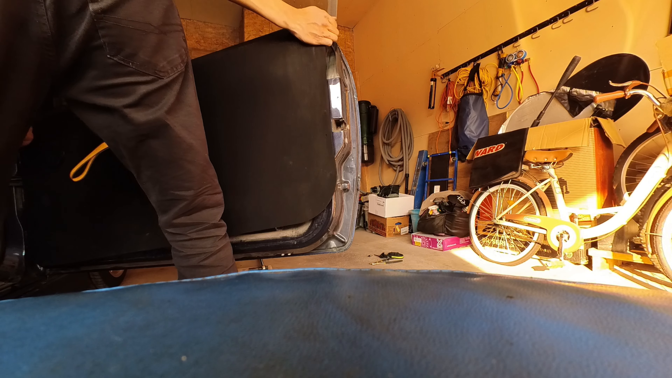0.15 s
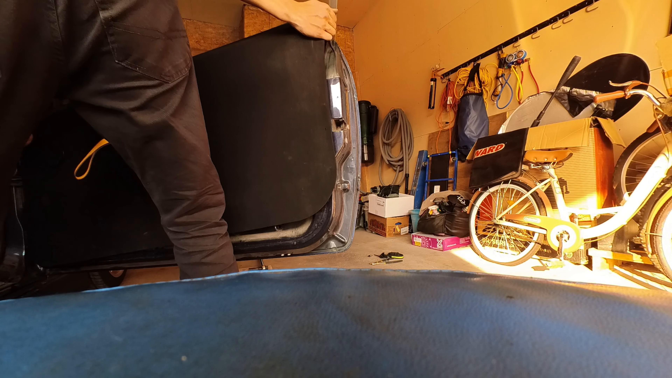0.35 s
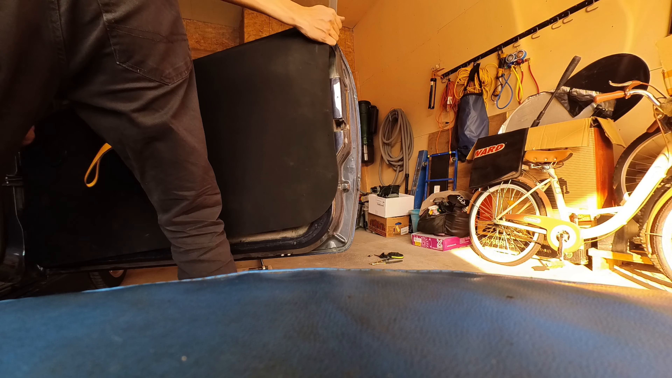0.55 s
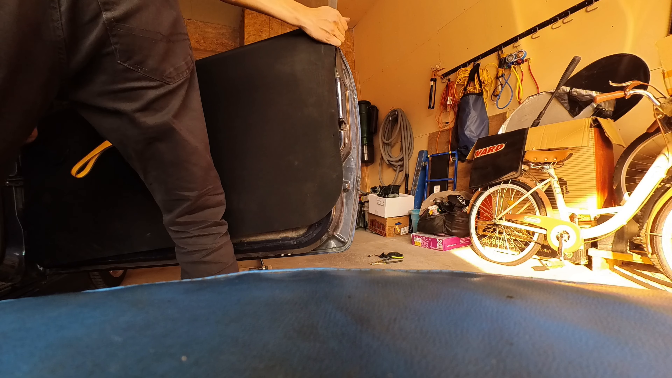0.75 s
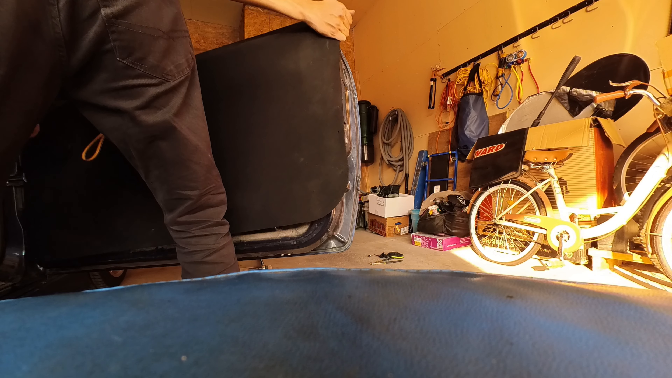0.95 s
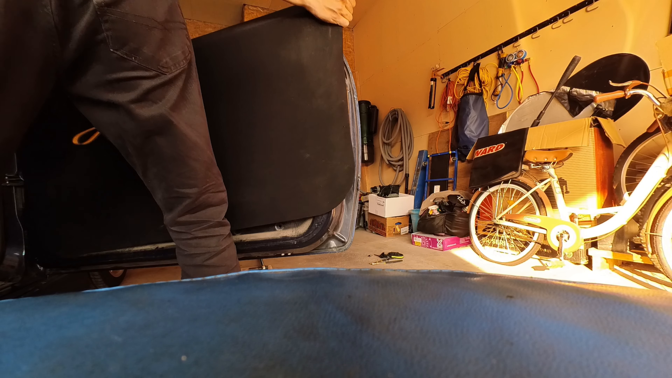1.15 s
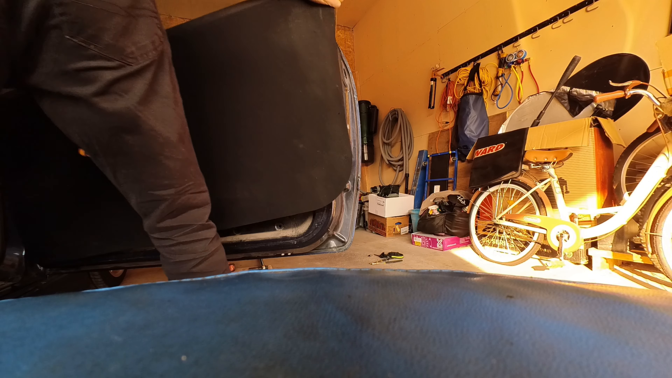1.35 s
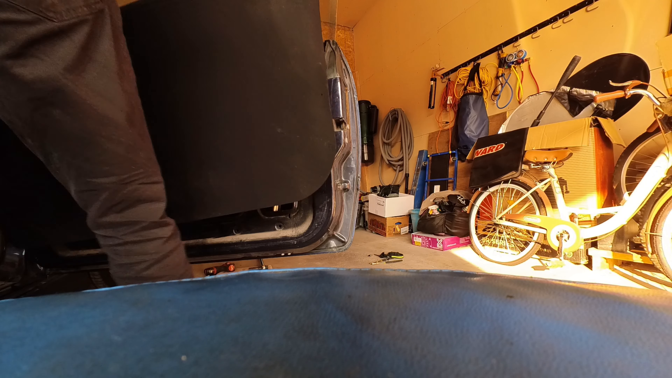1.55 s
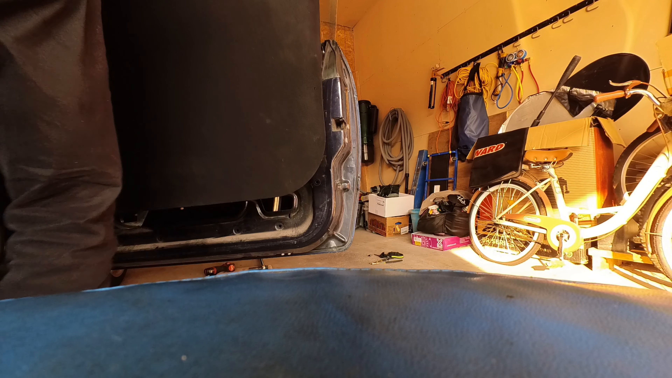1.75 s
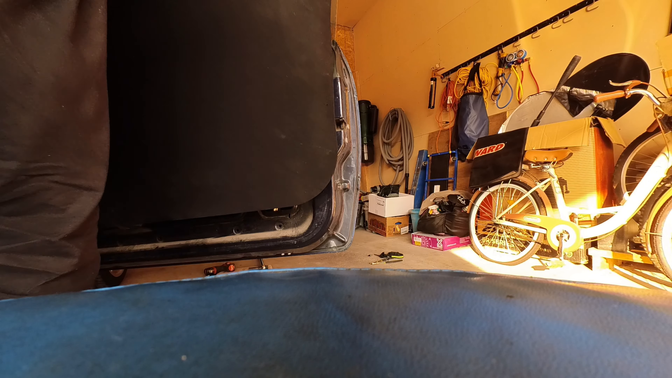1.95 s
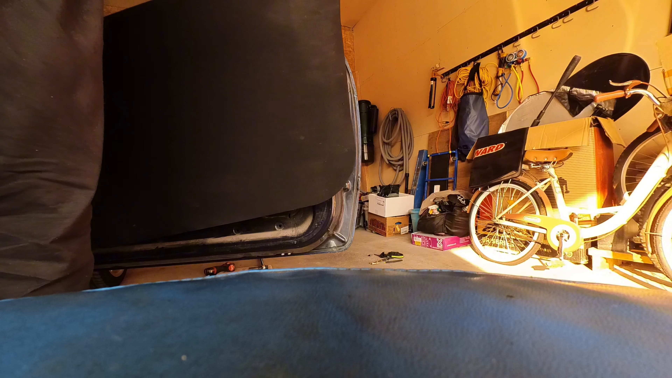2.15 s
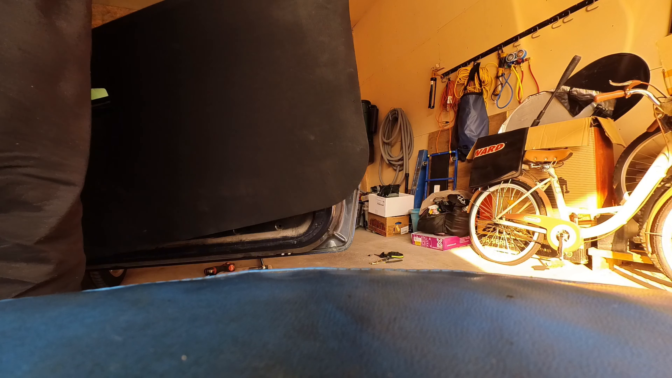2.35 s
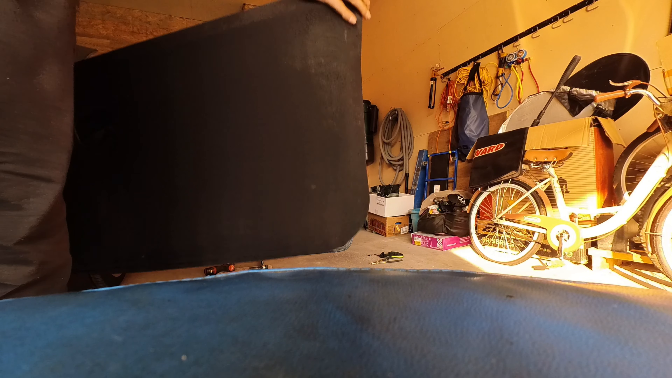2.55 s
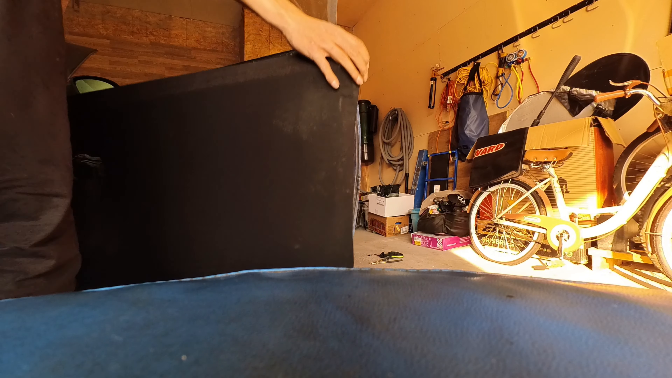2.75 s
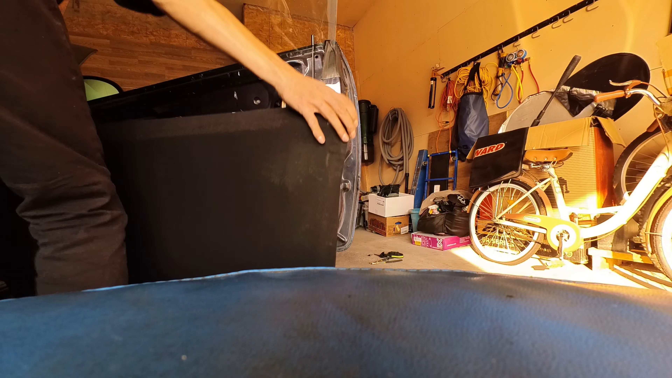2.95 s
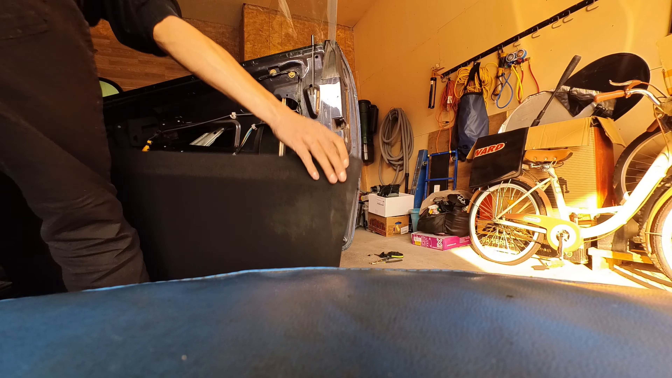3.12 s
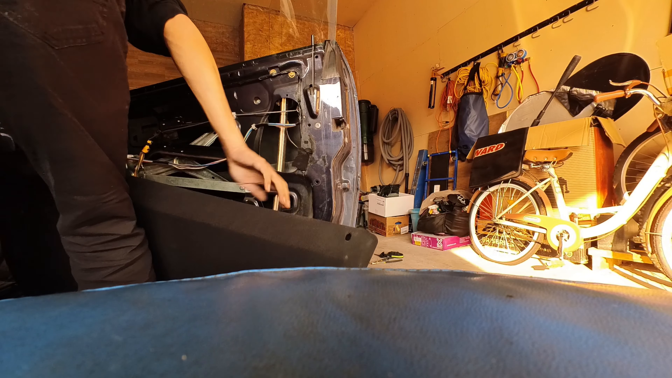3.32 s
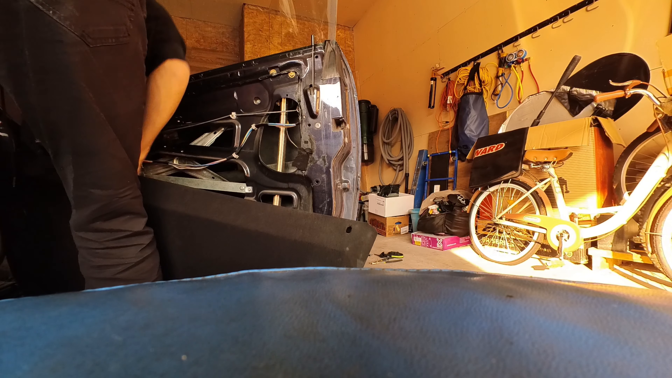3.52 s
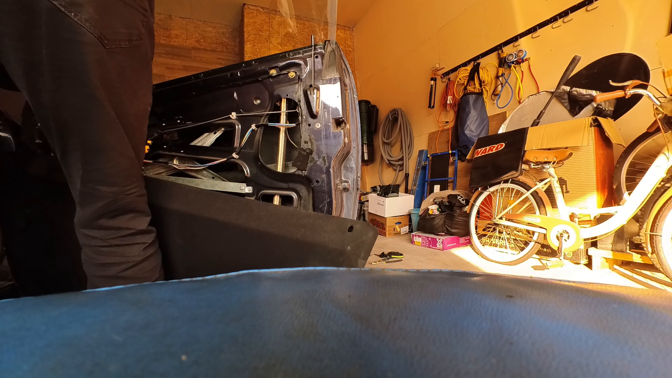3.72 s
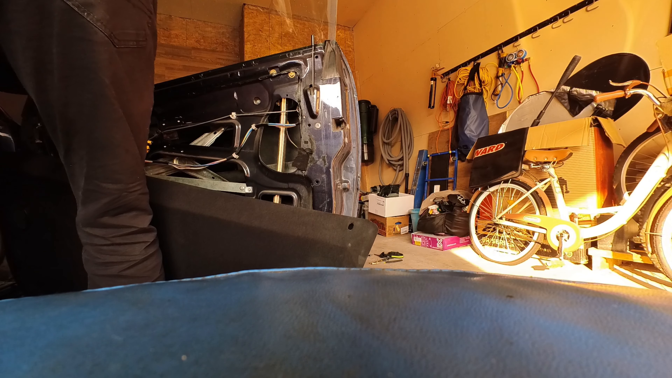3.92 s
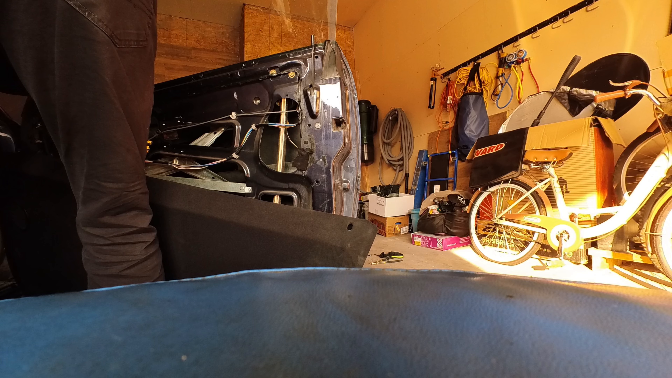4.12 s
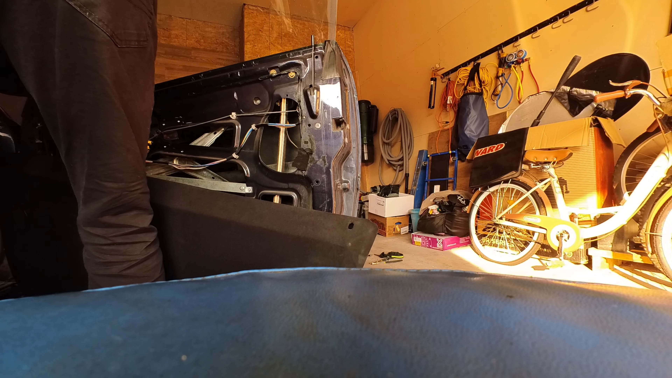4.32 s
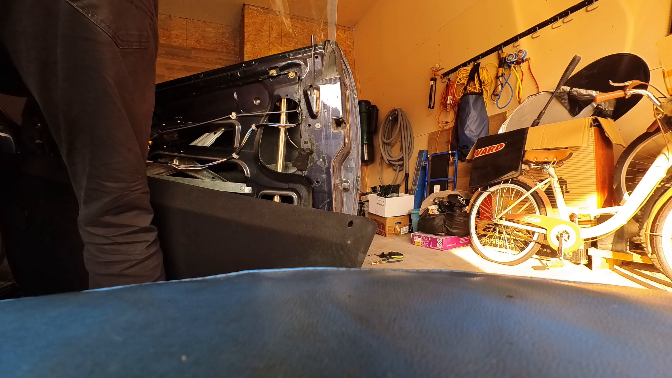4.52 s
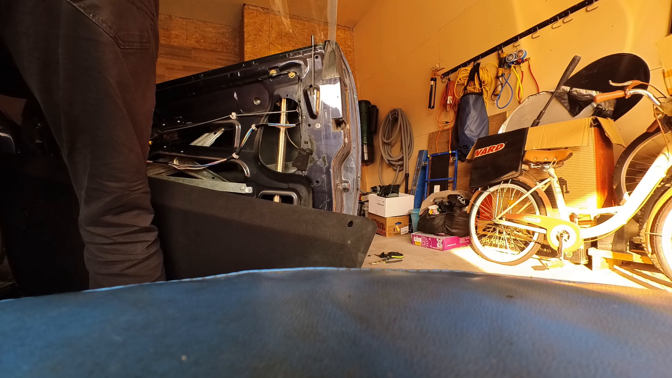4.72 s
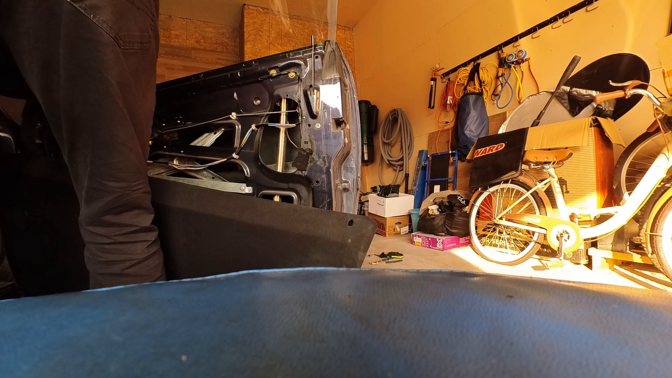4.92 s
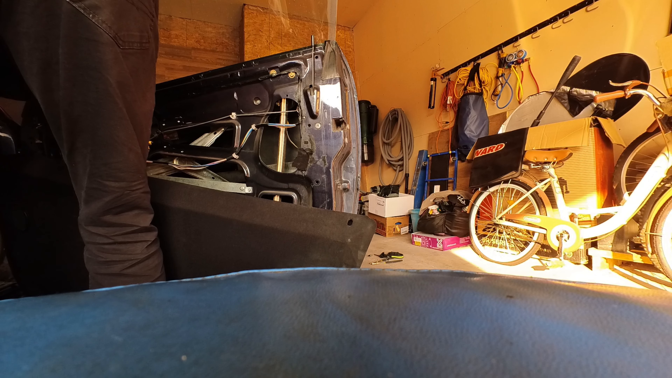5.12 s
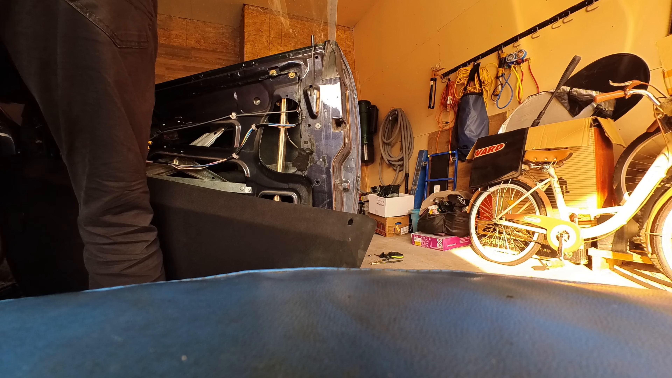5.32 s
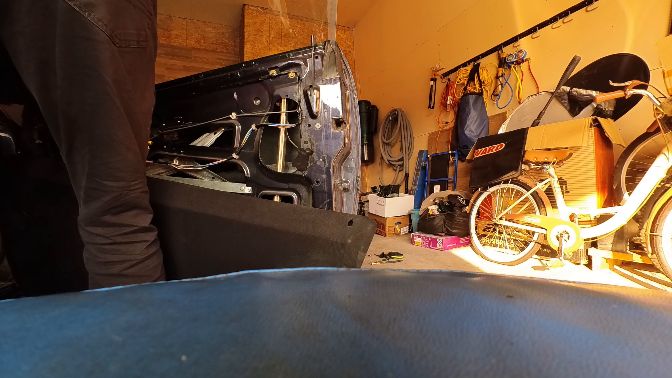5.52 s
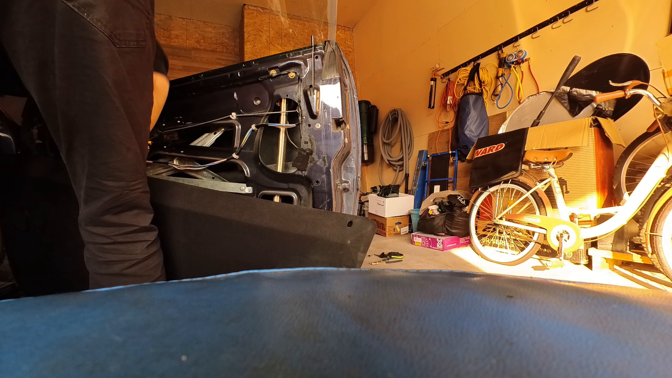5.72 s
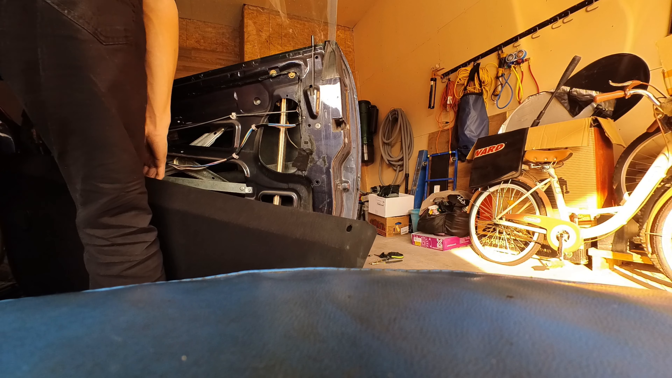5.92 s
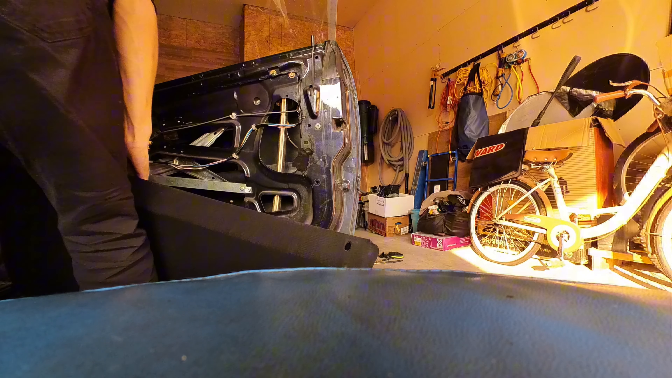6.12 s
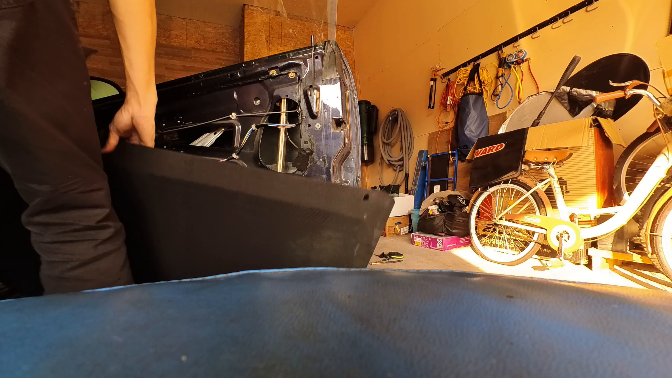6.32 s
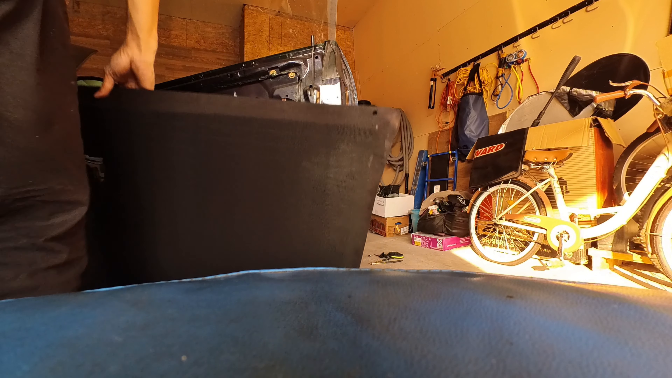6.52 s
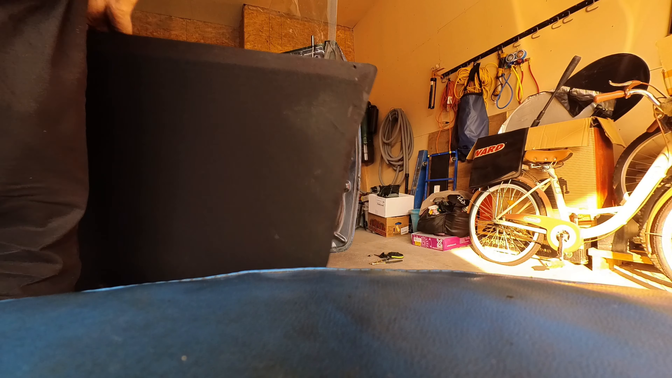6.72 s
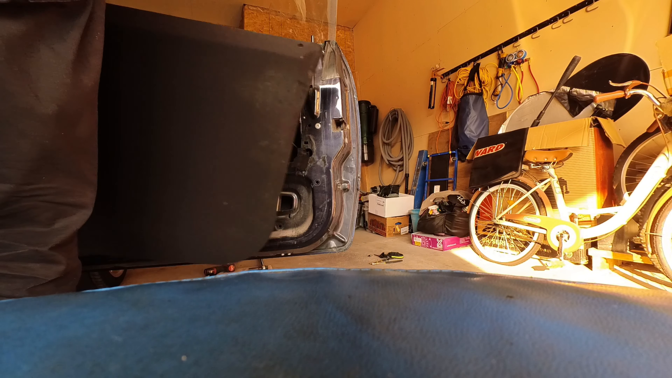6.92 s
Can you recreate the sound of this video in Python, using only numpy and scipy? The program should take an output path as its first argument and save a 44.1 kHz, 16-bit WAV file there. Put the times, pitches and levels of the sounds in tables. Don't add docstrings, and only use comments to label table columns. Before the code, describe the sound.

A small camera microphone sits near a car door in a cluttered, short-echoing garage. A low wobbling panel rumble fades, a hard hollow knock rings out, clips snap and edges scrape. The panel drops on the floor edge by edge, loud and woody, rocking quickly to rest. Road wash fills the gap before a clip click, a late knock, scuffing and a dull bump.

```python
import sys
import numpy as np
from scipy import signal
from scipy.fft import rfft, irfft, next_fast_len
from scipy.io import wavfile
from scipy.ndimage import uniform_filter1d, minimum_filter1d, map_coordinates

SR = 44100
rng = np.random.default_rng(int(sys.argv[2]) if len(sys.argv) > 2 else 0)


def bounce(signal):
    frames = np.transpose(np.atleast_2d(signal))
    limited = np.clip(frames, -1, 1)
    pcm = np.round(limited * 32767).astype(np.int16)
    wavfile.write(sys.argv[1], SR, pcm)


def makeup_ratio(level_db):
    decades = np.asarray(level_db, float) / 20
    return 10 ** decades


N = 306936


def unit(x):
    return x / np.sqrt(np.mean(x ** 2) + 1e-20)


def along(points, hz):
    point_hz, value = np.transpose(points)
    return np.interp(np.log(hz + 1), np.log(point_hz + 1), value)


def curve(rows):
    time_s, level_db = np.transpose(rows)
    return makeup_ratio(np.interp(np.arange(N) / SR, time_s, level_db, -200, -200))


def wobble(rate_hz):
    knots = rng.standard_normal(int(N * rate_hz / SR) + 4)
    return map_coordinates(knots, [np.arange(N) * rate_hz / SR])


def filtered(x, response):
    m = next_fast_len(x.shape[-1] + 2048)
    spectrum = rfft(x, m) * response(np.fft.rfftfreq(m, 1 / SR))
    return irfft(spectrum, m)[..., :x.shape[-1]]


def resonance(hz, width_hz):
    return lambda f: 1j * f * width_hz / (hz * hz - f * f + 1j * f * width_hz)


def rush(spectrum, patchy_db, spiky_db=0, size=8, count=10):
    white = rng.standard_normal(N) * makeup_ratio(spiky_db * wobble(900))
    z = signal.stft(white, nperseg=512)[2]
    field = uniform_filter1d(rng.standard_normal(z.shape), size, 0)
    field = uniform_filter1d(field, count, 1)
    patched = signal.istft(z * makeup_ratio(patchy_db * unit(field)), nperseg=512)[1][:N]
    return unit(filtered(patched, lambda hz: makeup_ratio(along(spectrum, hz))))


def stroke(peak_s, level_db, swell_s, fade_s):
    gain = np.zeros(N)
    first = max(0, int((peak_s - 5 * swell_s) * SR))
    last = min(N, int((peak_s + 5 * fade_s) * SR))
    late_s = np.arange(first, last) / SR - peak_s
    gain[first:last] = makeup_ratio(level_db - 20 * np.maximum(-late_s / swell_s, late_s / fade_s))
    return gain


def add(track, start_s, sound):
    part = track[round(start_s * SR):][:len(sound)]
    part += sound[:len(part)]


# time_s, level_db
ROAD_SWELL = [(0.0, -44.5), (.45, -43.5), (.8, -41), (2.29, -42), (2.89, -40.5), (3.37, -38), (3.9, -40),
              (5.19, -40), (5.78, -41.5), (6.96, -43)]
# hz, density_db
ENGINE_SPECTRUM = [(12, -52), (20, -0.5), (42, -9), (60, -1), (123, 3.5), (292, -1), (400, -18.5),
                   (520, -47), (880, -120)]
# hz, density_db
TYRE_SPECTRUM = [(88, -39), (150, -16.5), (245, -1.5), (360, -7), (399, -4), (477, -2), (553, -5), (903, 0),
                 (1160, -0.5), (1270, -3.5), (1560, -4.5), (2100, -12.5), (3190, -27), (4040, -44.5),
                 (5200, -54), (6760, -81.5), (11400, -120)]


def road():
    swell = curve(ROAD_SWELL)
    engines = unit(makeup_ratio(.6 * wobble(3.9)) * rush(ENGINE_SPECTRUM, patchy_db=1.4))
    tyres = makeup_ratio(-1.0 + 0.2 * wobble(3.4)) * rush(TYRE_SPECTRUM, patchy_db=0.8)
    return swell * (makeup_ratio(-7) * engines + tyres)


# hz, density_db
SWAY_SPECTRUM = [(12, -34), (25, -8), (45, -0.5), (70, -10), (150, -92)]


def handling():
    let_go_s, level_db = 2.7, -51.5
    sway = makeup_ratio(3 * wobble(4.96)) * rush(SWAY_SPECTRUM, patchy_db=-1.0)
    return stroke(let_go_s, level_db, 13.0, .5) * sway


# start_s, peak_db
BUMPS = [(0.755, -36.5), (0.941, -39), (0.971, -36.5), (1.006, -38), (1.031, -39), (1.057, -24.5),
         (1.097, -32), (1.502, -32.5), (1.932, -45), (1.948, -36), (2.779, -54), (3.533, -36), (6.3, -47),
         (6.35, -48), (5.3, -43)]


def bumps():
    track = np.zeros(N)
    cycle = np.arange(SR // 10) / SR * 80
    thud = np.sin(2 * np.pi * cycle) * np.exp(-((cycle - .55) / .5) ** 2)
    for start_s, peak_db in BUMPS:
        add(track, start_s, makeup_ratio(peak_db + 4.5) * thud)
    return track


# peak_s, level_db, swell_s, fade_s
SLEEVE = [
    (3.838, -66, .015, .02),
    (3.87, -58, .03, 0.066),
    (4.06, -69, .012, 0.053),
]
# hz, density_db
CLOTH_SPECTRUM = [(2350, -49), (4000, -17), (5250, -2), (8170, -10), (9410, -21), (11500, -14),
                  (14200, -17), (15500, -30)]


def sleeve():
    rustle = rush(CLOTH_SPECTRUM, patchy_db=3.5, spiky_db=2, size=4, count=6)
    return sum(stroke(*row) for row in SLEEVE) * rustle


# peak_s, level_db, hiss_db, swell_s, fade_s
PANEL_STROKES = [(.1, -57, -11.5, 0.11, 0.31), (.31, -61, -16.5, 0.034, 0.074), (.4, -58, -5, 0.022, 0.011),
                 (.43, -77, -2, .02, 0.14), (.69, -60.5, -15, .05, 0.14), (.98, -63, -24, 0.094, .13),
                 (1.09, -56.5, -15, 0.088, 0.043), (1.16, -65, -29, 0.04, .07), (1.3, -78.5, -6, .3, .45),
                 (1.61, -55.5, -12, 0.097, 0.13), (1.78, -75, -15, .2, .1), (1.879, -49.5, -9.5, .04, 0.1),
                 (2.12, -69, -10.5, 0.37, 0.14), (2.48, -66.5, -6, 0.021, 0.68),
                 (2.678, -56.5, -5.5, 0.18, 0.034), (2.776, -68, -7.5, 0.073, 0.27),
                 (2.992, -53.5, -14.5, 0.064, 0.056), (3.16, -55, -21, 0.086, 0.12),
                 (3.188, -44, -11.5, 0.046, .02), (3.314, -48, -9.5, 0.21, 0.02)]
# peak_s, level_db, hiss_db, swell_s, fade_s
SHOE_STROKES = [(5.28, -41.5, -11, .003, 0.018), (5.295, -68, -10, .01, .07), (5.525, -73, -20, .07, .05),
                (5.645, -73.5, -26, .04, .06), (5.75, -77, -26, .06, .12), (6.038, -70, -8, 0.1, 0.05),
                (6.168, -61, -13, .015, 0.12), (6.198, -57, -22, .015, 0.024),
                (6.296, -62, -18, 0.11, 0.18), (6.362, -58, -12, 0.042, 0.081), (6.45, -75, -4, .05, 0.65),
                (6.606, -58.5, -7, 0.017, 0.057), (6.66, -63, -12, 0.014, 0.31),
                (6.95, -79, -16, 0.019, .03)]
# hz, density_db
SCRAPE_SPECTRUM = [(1470, -27), (2500, 4), (2920, 4), (3140, 2.5), (3420, -3), (4120, -3), (4750, -7),
                   (5100, -3), (5500, -9), (6650, -9.5), (8110, -12.5), (10500, -35), (13600, -52),
                   (22000, -120)]
# hz, density_db
HISS_SPECTRUM = [(5590, -35), (9500, -6.5), (10800, -5), (13400, 3), (15000, -4.5), (15600, -7.5)]


def scuff():
    scrape_gain, hiss_gain = np.zeros(N), np.zeros(N)
    for peak_s, level_db, hiss_db, swell_s, fade_s in PANEL_STROKES + SHOE_STROKES:
        gain = stroke(peak_s, level_db, swell_s, fade_s)
        scrape_gain += gain
        hiss_gain += gain * makeup_ratio(hiss_db)
    clumps = makeup_ratio(1.2 * wobble(30))
    scrape = scrape_gain * rush(SCRAPE_SPECTRUM, 3.2, 1.8, size=3, count=9)
    hiss = hiss_gain * rush(HISS_SPECTRUM, 3, 1.5, size=3, count=8)
    return clumps * (scrape + hiss)


# start_s, peak_db, centre_hz
TICKS = [(0.166, -56.5, 13100), (0.1764, -51, 13400), (0.184, -49, 14100), (0.2044, -55, 14800),
         (0.2134, -50, 14700), (0.233, -48, 13800), (0.2572, -46.5, 13600), (0.2856, -40, 13700),
         (0.3113, -40, 13300), (0.3501, -46, 12400), (0.3935, -49, 12500), (.676, -57.5, 13000),
         (1.5584, -59.5, 13100), (2.1405, -56, 12900), (2.1624, -64, 13100), (2.811, -55, 14000),
         (2.845, -58, 13500), (2.93, -60, 9500), (3.167, -48, 13000), (3.177, -46, 13000)]


def ticks():
    track, t = np.zeros(N), np.arange(SR // 40) / SR
    for start_s, peak_db, hz in TICKS:
        slip = rng.standard_normal(len(t)) * makeup_ratio(-60 * t / .012)
        burst = filtered(slip, lambda f: resonance(hz, 2500)(f) ** 2)
        add(track, start_s, makeup_ratio(peak_db - 0.5) * burst / np.abs(burst).max())
    return track


# start_s, peak_db, centre_hz, hiss_db
SNAPS = [(0.6694, -55, 3580, -17), (1.076, -47, 3640, -11), (1.1514, -57, 4060, -34),
         (1.558, -56.5, 5000, -15), (1.593, -45, 5040, -22), (1.857, -40, 6500, -9),
         (2.549, -49.5, 5660, -15), (2.7795, -43, 3250, -17), (2.944, -47, 3580, -15),
         (2.984, -39.5, 3570, -14), (3.1687, -26.5, 3860, -20), (3.1846, -30, 4900, -19.5),
         (3.338, -36, 5000, -21), (3.344, -32.5, 5800, -15), (3.35, -27.5, 5500, -17),
         (3.356, -17, 6000, -19), (3.3614, -29, 3680, -26), (3.367, -24.5, 5750, -25),
         (3.384, -39, 7500, -27), (3.404, -42, 7000, -25), (3.431, -39, 4940, -35), (3.836, -52, 6470, -7),
         (3.8527, -43, 6500, -4), (4.049, -46.5, 3660, -20), (5.2704, -36, 4890, -11),
         (5.2766, -33.5, 6500, -8), (6.1745, -34.5, 5660, -36), (6.198, -44, 3500, -27),
         (6.284, -47, 5500, -20), (6.345, -43, 3000, -15), (6.359, -37.5, 3600, -16),
         (6.601, -50.5, 5070, -11), (6.6603, -54, 5240, -15)]
# hz, density_db
CRACK_SPECTRUM = [(1470, -22), (2500, -3.5), (2750, -5), (3420, -8.5), (3880, -12), (4640, -8),
                  (5460, -10.5), (8930, -28.5), (10500, -28.5), (13600, -59), (22000, -120)]


def snaps():
    track, t = np.zeros(N), np.arange(SR // 5) / SR
    t60_s, rise_s = 0.048, .0012
    decay = makeup_ratio(-60 * t / t60_s)
    envelope = (1 - np.exp(-t / rise_s)) * decay
    scale = np.sqrt(t60_s * SR / 14)
    for start_s, peak_db, hz, hiss_db in SNAPS:
        noise = rng.standard_normal((3, len(t))) * envelope
        tone = filtered(noise[0] * decay, lambda f: resonance(hz, .35 * hz)(f) ** 2)
        crack = filtered(noise[1], lambda f: makeup_ratio(along(CRACK_SPECTRUM, f)))
        puff = filtered(noise[2], lambda f: makeup_ratio(along(HISS_SPECTRUM, f)))
        tone, crack, puff = [scale * p / np.linalg.norm(p) for p in (tone, crack, puff)]
        add(track, start_s, makeup_ratio(peak_db - 7) * (.6 * tone + .8 * crack + makeup_ratio(hiss_db) * puff))
    return track


# hz, level_db, t60_s
CLIP_MODES = [(5060, -54, 0.06), (6800, -53, 0.067), (11600, -52, 0.063)]


def clip():
    track, t = np.zeros(N), np.arange(SR // 4) / SR
    for hz, level_db, t60_s in CLIP_MODES:
        ring = filtered(rng.standard_normal(len(t)), lambda f: resonance(hz, 250)(f) ** 2)
        add(track, 5.2785, makeup_ratio(level_db - 60 * t / t60_s) * unit(ring))
    return track


# start_s, peak_db, hz, t60_s
PINGS = [(.677, -60, 7800, 0.017), (1.865, -48, 6740, .02), (1.877, -47, 6900, .02), (1.88, -50, 5000, .02),
         (2.781, -46, 5330, .015), (3.176, -39, 4500, .015), (3.187, -36, 4900, .015),
         (3.3568, -24, 5850, 0.016), (3.369, -33, 5500, .012), (3.375, -37, 5000, .012),
         (3.431, -36, 4900, .02), (3.828, -57, 5500, .03), (3.853, -40, 6650, 0.017),
         (3.876, -52, 5100, .015), (4.05, -57, 5200, .015), (4.052, -59, 6700, .04),
         (4.051, -60, 8000, .015), (6.367, -46, 2890, .015), (6.359, -43, 4000, .006),
         (6.378, -47, 5000, .02)]
# start_s, peak_db, hz, t60_s
CORNER_RINGS = [(1.111, -24, 1137, .075), (1.148, -33, 333, .04), (1.165, -37, 236, .05),
                (1.197, -36, 1012, .03), (1.106, -31, 721, .03), (1.155, -33, 1076, .025),
                (1.089, -35, 1722, .02), (1.844, -37, 1033, .025), (1.869, -40, 904, .02),
                (3.061, -39, 1044, .03), (3.067, -33, 247, .05), (3.111, -42, 1670, .03),
                (3.175, -43, 2400, .03), (3.188, -34.5, 139, 0.086), (3.19, -40, 1620, .03),
                (3.2, -36, 872, .04), (3.213, -39, 1679, .03), (3.339, -14, 390, .04),
                (3.358, -29, 2831, .02), (3.36, -26, 2142, .02), (3.368, -19, 1604, .025),
                (3.368, -28, 2490, .02), (3.3735, -9, 400, .035), (3.374, -26, 1841, .02),
                (3.382, -24, 1475, 0.022), (3.383, -26, 2045, .025), (3.387, -19, 129, .05),
                (3.389, -16, 552, .03), (3.402, -15, 610, .035), (3.4, -29, 2164, .02),
                (3.419, -25, 742, .03), (3.419, -31, 2200, .015), (3.434, -25, 2400, 0.022),
                (3.348, -26, 1981, .02), (3.432, -22, 473, .03), (3.436, -19, 300, .035),
                (3.437, -23, 1150, .025), (3.445, -24, 656, .03), (5.266, -36, 236, .04),
                (5.274, -36, 656, 0.028), (5.293, -35, 829, .03), (5.314, -38, 979, .025),
                (6.1745, -30, 1658, .018), (6.175, -36, 2250, .015), (6.192, -34, 1130, .03),
                (6.204, -40, 1475, .02), (6.211, -30, 861, .025), (6.214, -36, 1324, .02),
                (6.215, -38, 300, .08), (6.243, -38, 1195, .025)]


def pings(rows):
    track, t = np.zeros(N), np.arange(SR // 14) / SR
    rise = 1 - np.exp(-t / .0008)
    for start_s, peak_db, hz, t60_s in rows:
        add(track, start_s, makeup_ratio(peak_db - 60 * t / t60_s) * rise * np.sin(2 * np.pi * hz * t))
    return track


# time_s, effort_db
FLEX_EFFORT = [(0.0, -32), (0.03, -35.5), (0.075, -24), (0.118, -28.5), (0.15, -22), (0.225, -30.5),
               (0.422, -38), (0.47, -48), (0.62, -54)]
# hz, width_hz, level_db
BOOM_MODES = [(124, 35, -5), (78, 22, 3.5), (172.7, 23, 3)]
# hz, density_db
RUMBLE_SPECTRUM = [(71, -22), (120, 0), (199, -6.5), (290, -6), (433, -11), (795, -19), (1520, -24.5),
                   (3500, -48), (4550, -79), (7700, -120)]
# peak_s, level_db, fade_s (20 dB each side; none if <= 0)
SLIPS = [(.095, -43, 0.07), (.118, -42, 0), (.19, -51, 0.3), (.7, -51.5, 0.37), (6.29, -51.5, 0.27),
         (6.365, -46, -0.14)]
# hz, density_db
GRIT_SPECTRUM = [(700, -22), (1400, 0.5), (2500, -3), (3600, -15), (5000, -48)]


def flex():
    effort = curve(FLEX_EFFORT)
    lag_s = 0.033
    pole = 1 / (lag_s * SR)
    rumble_gain = makeup_ratio(-4.5) * signal.lfilter([pole], [1, pole - 1], effort, zi=effort[:1])[0]
    rumble = rumble_gain * makeup_ratio(0.5) * rush(RUMBLE_SPECTRUM, 0.52, 0.69)

    drag = makeup_ratio(-27) * rumble_gain
    drag = drag + sum(stroke(peak_s, level_db, fade_s, fade_s) for peak_s, level_db, fade_s in SLIPS)
    grit = drag * rush(GRIT_SPECTRUM, patchy_db=2, spiky_db=3)

    phase = 2 * np.pi * np.cumsum(99.15 * (1 + .03 * wobble(20))) / SR
    drive = stroke(.2, 0.5, 9.0, .9)
    lowest = drive * makeup_ratio(1.4 * wobble(23.5)) * np.sin(phase)

    def modes(f):
        return sum(makeup_ratio(db) * resonance(hz, width_hz)(f) ** 2 for hz, width_hz, db in BOOM_MODES)

    boom = lowest + 0.34 * unit(filtered(rng.standard_normal(N), modes))
    return effort * boom + rumble + grit


# start_s, peak_db, ring_hz, ring_t60_s, board_db
KNOCKS = [(1.074, -38, 1300, 0.02, -9), (1.0801, -10.5, 1167, 0.032, -24), (1.081, -25, 690, 0.07, -6),
          (1.099, -26.5, 862, 0.087, -10), (1.082, -19.5, 1020, 0.034, -20.5),
          (1.093, -35, 1950, 0.03, -20), (1.087, -16, 251, 0.048, -20), (1.097, -23, 1200, 0.03, -19),
          (1.1, -20, 258, 0.04, -19), (1.111, -31, 882, 0.03, -15), (1.127, -29, 990, 0.027, -19),
          (1.143, -28, 1070, .025, -16), (1.1547, -23, 1580, 0.016, -7.5), (1.168, -28.5, 1150, 0.025, -9),
          (1.8531, -22.5, 470, 0.02, -14.5), (1.866, -32.5, 1470, 0.038, -14),
          (1.873, -26, 595, 0.034, -12), (2.782, -40, 2300, 0.021, -5), (3.075, -33, 330, 0.02, -6),
          (3.168, -41.5, 2247, 0.14, 7), (5.2708, -30, 1460, 0.012, -2), (6.174, -11, 680, 0.014, -15),
          (6.175, -25.5, 1067, 0.047, -7), (6.175, -38, 2910, 0.028, -15), (6.202, -31, 861, 0.025, -10),
          (6.2, -38, 2870, 0.019, -12), (6.197, -32, 645, 0.025, -14), (6.287, -43.5, 2300, 0.0194, 3),
          (6.31, -45, 2190, .02, -5), (6.348, -43, 1920, .02, -5), (6.362, -45, 1950, .03, 0),
          (6.599, -23.5, 433, 0.026, -20), (6.66, -44, 2410, 0.027, -14)]
# start_s, peak_db, ring_hz, ring_t60_s, board_db
DROP = [(3.338, 2, 660, 0.008, -16), (3.341, -19, 161.5, 0.2, -3), (3.342, -9.5, 672, 0.065, -8),
        (3.35, -14, 835, 0.089, -15.5), (3.356, -11, 1200, 0.015, -3), (3.361, -18, 1940, 0.02, -7),
        (3.36, -8, 350, .025, -5), (3.362, -14, 193, 0.035, -10), (3.381, -3, 860, 0.011, -14),
        (3.388, -3.5, 330, 0.03, -12), (3.399, -15.5, 434, 0.034, -8), (3.406, -17.5, 950, .015, -7.5),
        (3.431, -19, 689, 0.035, -6), (3.439, -19, 915, 0.02, -6), (3.445, -20.5, 900, .02, -6.5),
        (3.455, -22, 860, .025, -14), (3.464, -23, 400, 0.025, -14), (3.492, -21, 120, 0.06, -16),
        (3.512, -27, 172, .04, -10), (3.519, -30, 1090, 0.02, -6.5), (3.524, -22.5, 754, 0.023, -5.5),
        (3.535, -28, 427, 0.024, -11.5), (3.567, -30, 398, 0.047, -17), (3.573, -37, 1450, .015, -11.5)]
# hz, width_hz, level_db
BOARD_MODES = [(350, 260, -3), (676, 41, 3), (850, 30, -5), (1150, 23, -24), (1320, 14, -10),
               (1950, 52, -10), (2440, 20, -12), (2590, 14, -12.5), (2850, 34, -15.5)]
# hz, density_db
BODY_SPECTRUM = [(18, -48.5), (30, -37), (86, -2), (191, -14), (327, -8.5), (478, -9), (851, -5),
                 (1080, -8), (2450, -20.5), (3500, -40.5), (4550, -68.5), (7700, -120)]


def knocks():
    blows = KNOCKS + DROP
    track, t = np.zeros(N), np.arange(SR // 4) / SR
    rise = 1 - np.exp(-t / .0003)
    spread = 1 - np.exp(-t / .002)

    def board_response(f):
        peaks = sum(abs(resonance(hz, width_hz)(f)) ** 2 * makeup_ratio(0.28 * db) for hz, width_hz, db in BOARD_MODES)
        return (1 + 1.3 * peaks) * makeup_ratio(along(BODY_SPECTRUM, f))

    noise = rng.standard_normal((len(blows), 3, len(t)))
    bodies = filtered(noise[:, 1], board_response)
    bodies = bodies / bodies.std(axis=1, keepdims=True)
    lows = filtered(bodies, lambda f: 1 / (1 + (f / 300) ** 4))
    loose = unit(filtered(noise[:, 2], lambda f: resonance(2200, 1800)(f) ** 2))
    for blow, hiss, body, low, parts in zip(blows, noise[:, 0], bodies, lows, loose):
        start_s, peak_db, hz, t60_s, board_db = blow
        spot = makeup_ratio(-60 * t / t60_s) * np.sin(2 * np.pi * hz * t)
        near = unit(filtered(hiss, lambda f: resonance(hz, .35 * hz)(f) ** 2))
        smear = 0.15 * makeup_ratio(-60 * t / (1.7 * t60_s)) * near
        board = low * makeup_ratio(-60 * t / 0.16) + (body - low) * makeup_ratio(-60 * t / 0.086)
        board = makeup_ratio(board_db) * board
        rattle_db = board_db - 13.5 + 10 * np.log2(hz / 1000)
        rattle = makeup_ratio(rattle_db - 60 * t / 0.066) * parts
        add(track, start_s, makeup_ratio(peak_db) * (rise * (spot + rattle) + spread * (smear + board)))
    return filtered(track, lambda f: 1 / (1 + 1j * f / 3600 - (f / 3600) ** 2) ** 2)


# hz, t60_s
GARAGE_DECAY = [(80, 0.83), (300, 0.63), (1500, 0.52), (5000, 0.43), (14000, 0.31)]


def garage(x):
    wet, step = np.zeros(N), SR // 4
    for start in range(0, N, step):
        hz, t, z = signal.stft(rng.standard_normal(SR // 2), SR, nperseg=256)
        decay = makeup_ratio(-60 * t / along(GARAGE_DECAY, hz)[:, None])
        tail = signal.istft(z * decay, SR, nperseg=256)[1]
        echo = signal.fftconvolve(x[start:start + step], tail / np.linalg.norm(tail))
        add(wet, start / SR + .006, echo)
    return wet


def scattered(x):
    z, noise = signal.stft(np.array([x, rng.standard_normal(N)]), nperseg=256)[2]
    power = uniform_filter1d(abs(z) ** 2, size=5, axis=0)
    power = uniform_filter1d(power, size=3, axis=1)
    noise = noise / np.sqrt(np.mean(abs(noise) ** 2))
    return signal.istft(np.sqrt(abs(power)) * noise, nperseg=256)[1][:N]


# hz, gain_db
SIDE_GAIN = [(1800, -83), (2600, -50), (3600, -11.5), (5000, -11.5), (8000, -14.5), (11000, -11),
             (14500, -17)]


def scene():
    low = knocks() + makeup_ratio(3.5) * pings(CORNER_RINGS)
    high = snaps() + ticks() + clip() + pings(PINGS)
    room = garage(makeup_ratio(-12.0) * low + makeup_ratio(-11.5) * high)
    treble = filtered(room, lambda hz: hz > 3000)
    room = room - treble + scattered(treble)
    mid = road() + handling() + bumps() + sleeve() + scuff() + flex() + low + high + room
    t = np.arange(SR // 8) / SR
    scramble = rng.standard_normal(len(t)) * makeup_ratio(-60 * t / .25)
    diffuse = signal.fftconvolve(mid, scramble / np.linalg.norm(scramble))[:N]
    side = filtered(diffuse, lambda hz: makeup_ratio(along(SIDE_GAIN, hz)))
    return np.array([mid + side, mid - side])


def roll_off(x):
    return signal.sosfilt(signal.butter(12, 15750, fs=SR, output="sos"), x)


# hz, density_db
MIC_HISS = [(3000, -24.5), (5000, 4.5), (9000, -4), (12200, -4.5), (12900, -18.5), (15500, -36)]


def record(dry):
    dry = dry + makeup_ratio(-88.0) * rush(MIC_HISS, patchy_db=1.0)
    need = np.minimum(1, .75 / (np.abs(dry).max(axis=0) + 1e-9))
    gain = uniform_filter1d(minimum_filter1d(need, size=1400), size=600)

    def housing(hz):
        notch = 1 - 0.32 * abs(resonance(4250, 300)(hz)) ** 2
        return (hz < 15750) * notch

    return roll_off(filtered(dry * gain, housing))


dry = scene()
out = record(dry)
bounce(out)
```